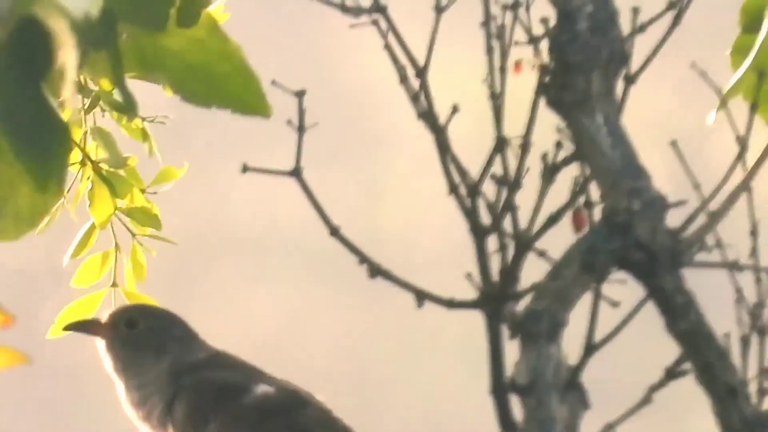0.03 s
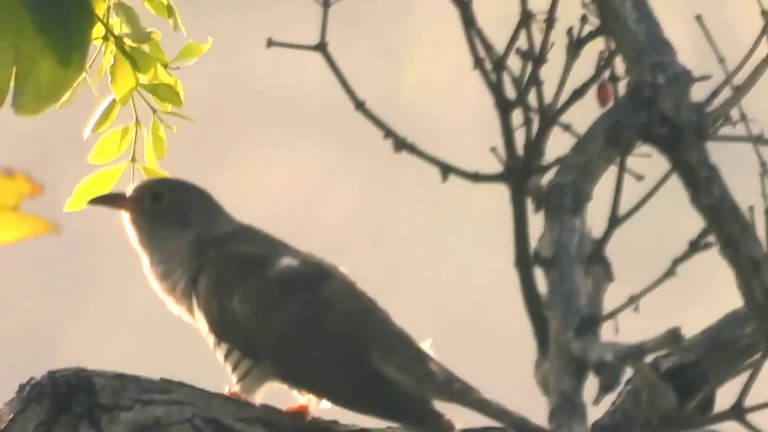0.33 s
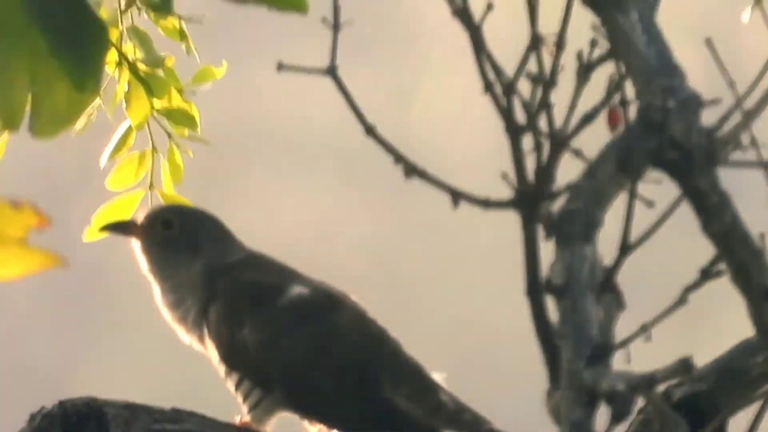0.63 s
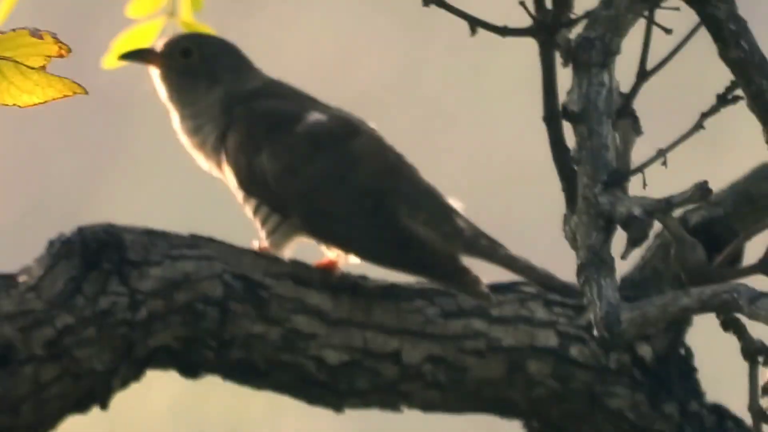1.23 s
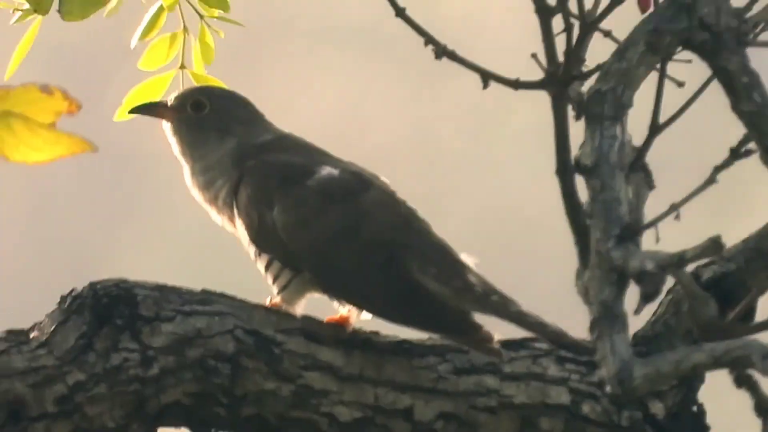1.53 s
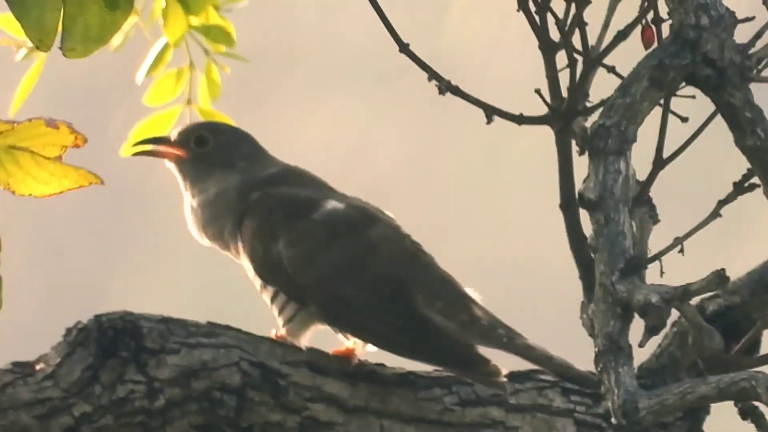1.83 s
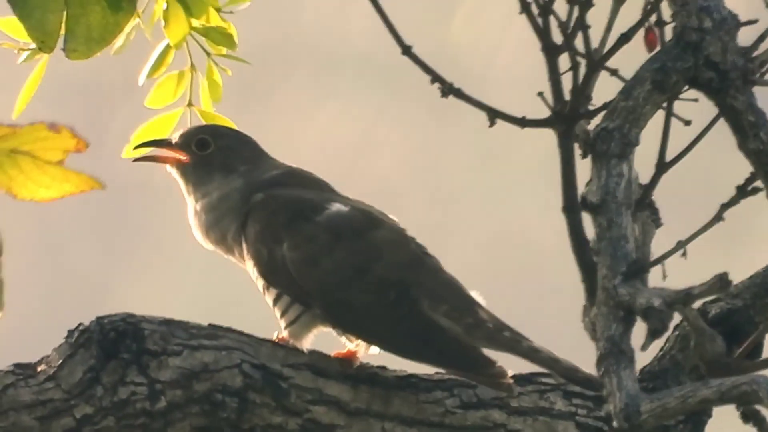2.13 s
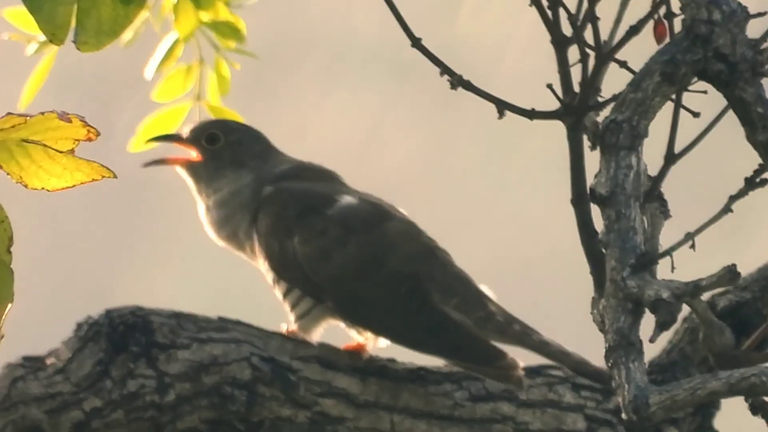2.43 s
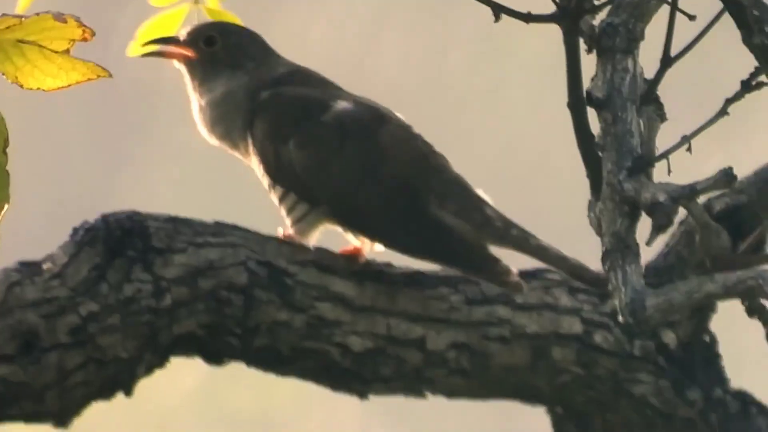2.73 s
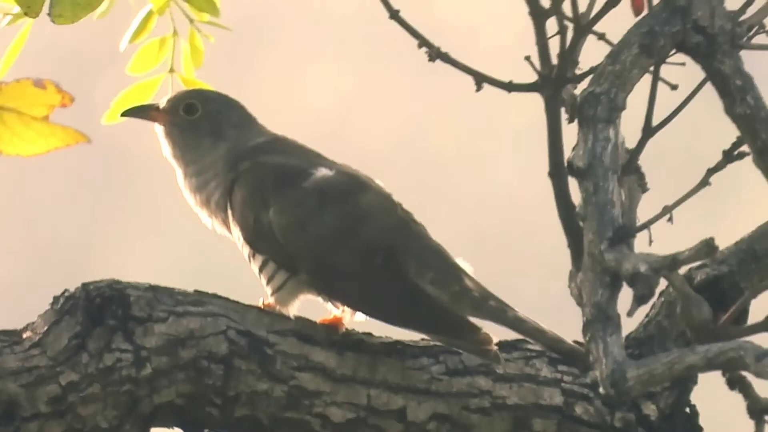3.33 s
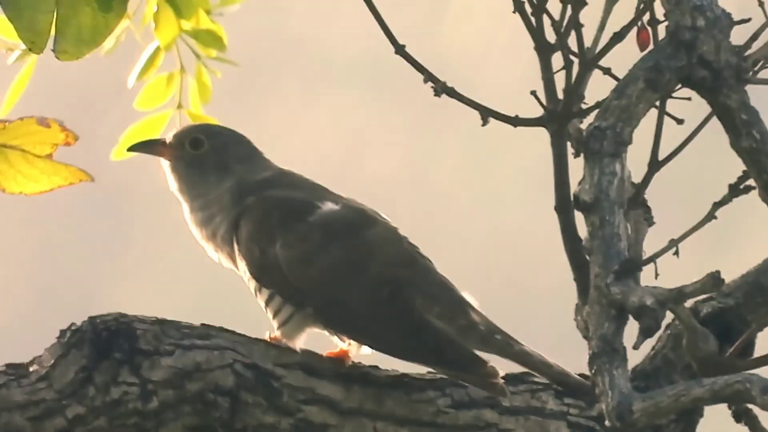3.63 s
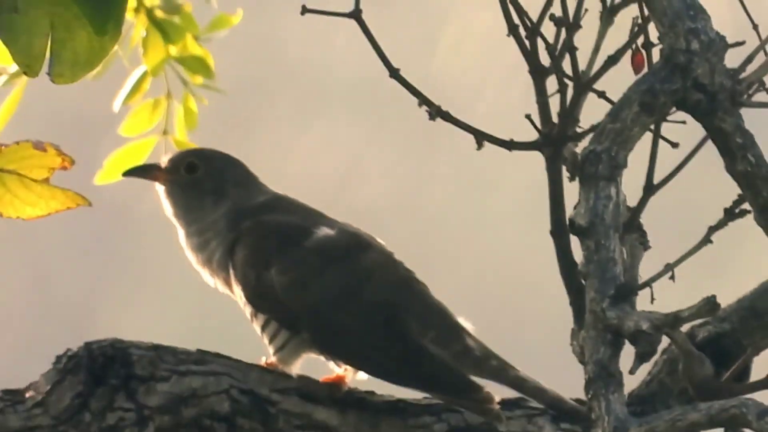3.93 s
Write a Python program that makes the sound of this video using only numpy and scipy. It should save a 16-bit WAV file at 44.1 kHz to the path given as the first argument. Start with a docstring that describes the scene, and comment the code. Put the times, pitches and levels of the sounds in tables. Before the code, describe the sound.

Cuckoos call in echoing woods over faint leaf hush and distant ticking frogs. A twig snaps at the start. A hollow, falling two-note call comes at 0.4 seconds, then small birds twitter and whistle until 1.5. From 2 to 3 seconds a louder cuckoo whistles four higher notes, overlapping the first's repeat at 2.6. A songbird buzzes, a dove coos softly, and one last cuckoo note sounds near 3.9.

```python
"""Echoing woods. Over a bed of leaf hush, insects and faint rumble a twig snaps; far frogs start
ticking and a thin pip repeats. A cuckoo calls a hollow "cuck-oo" as distant birds whistle, a scratchy
twitter and treble chatter build, and a near songbird chirps. From 2 s a second cuckoo scoops up to four
higher whistles, overlapping the first one's next call; the songbird buzzes, a dove coos softly and
there is one dry click. A last lone "cuck" comes just before the end."""
import sys
import numpy as np
from scipy import signal
from scipy.fft import rfft, irfft, next_fast_len
from scipy.io import wavfile
from scipy.ndimage import uniform_filter1d, map_coordinates

SR = 44100
rng = np.random.default_rng(int(sys.argv[2]) if len(sys.argv) > 2 else 0)


def output_pcm(signal):
    """Save a mono or channel-first signal as 16-bit PCM at the path in sys.argv[1].

    Samples are clipped to [-1, 1] before scaling.
    """
    pcm = np.clip(np.atleast_2d(signal).T, -1, 1) * 32767
    wavfile.write(sys.argv[1], SR, np.round(pcm).astype(np.int16))


N = 176400


def amp(db):
    """Decibels to gain."""
    return 10 ** (np.asarray(db) / 20)


def unit(x):
    """Scale to rms 1."""
    return x / np.sqrt(np.mean(x ** 2) + 1e-20)


def along(points, hz):
    """Read a curve of (f/Hz, value) points on a log frequency axis."""
    f, v = np.transpose(points)
    return np.interp(np.log(hz + 1), np.log(f + 1), v)


def wobble(rate, size):
    """A smooth random modulator, rate knots a second."""
    return map_coordinates(rng.standard_normal(int(size * rate / SR) + 4), [np.arange(size) * rate / SR])


def filtered(x, response):
    """Play x through a frequency response."""
    m = next_fast_len(N + SR // 2)
    return irfft(rfft(x, m) * response(np.fft.rfftfreq(m, 1 / SR)), m)[..., :N]


def add(out, s, x, pan_db=0):
    """Mix a sound in at time s; pan is left level over right."""
    i = max(round(s * SR), 0)
    out[:, i:i + len(x)] += amp([[pan_db / 2], [-pan_db / 2]]) * x[:N - i]


def lagged(x, lag_s):
    """Sound from the left reaches the right channel later."""
    return filtered(x, lambda f: np.exp(1j * np.pi * f * lag_s * np.array([[1], [-1]])))


def tone(hz, partials=(), rough=0, rough_hz=600):
    """A whistle on a pitch curve, with weak partials and a flutter of phase and level."""
    phase = 2 * np.pi * np.cumsum(hz) / SR + 2 * rough * wobble(rough_hz, len(hz))
    wave = np.sin(phase) + sum(amp(db) * np.sin(k * phase) for k, db in partials)
    return unit(wave * (1 + rough * wobble(rough_hz, len(hz))))


def glides(rows, partials=(), swing_hz=0, buzz_hz=245.5, rough_hz=600):
    """Notes that bend through three pitches; a fast swing of pitch and level makes them buzz."""
    out = np.zeros((2, N))
    for s, length, first, middle, last, db, rough, pan_db in rows:
        u = np.linspace(0, 1, int(length * SR))
        hz = np.polyval(np.polyfit([0, .5, 1], [first, middle, last], 2), u)
        beat = np.sin(2 * np.pi * buzz_hz * length * u + wobble(89.4, len(u)))
        gain = np.abs(np.sin(np.pi * u ** 0.84)) * (1 + 0.41 * beat * (swing_hz > 0))
        add(out, s, amp(db) * gain * tone(hz + swing_hz * beat, partials, rough, rough_hz), pan_db)
    return out


# stereo image of the noise beds: f/Hz, left-right correlation
BED_IMAGE = [(60, 0.25), (300, 0.81), (800, 0.71), (2000, 0.46), (5000, 0.064)]
def rush(colour, patchy_db):
    """A stereo noise bed of rms 1, mottled with patches of random gain."""
    spectrum = signal.stft(rng.standard_normal((2, N)), nperseg=512)[2]
    patches = uniform_filter1d(rng.standard_normal(spectrum.shape[1:]), size=5, axis=0)
    patches = unit(uniform_filter1d(patches, size=14, axis=1))
    pair = signal.istft(spectrum * amp(patchy_db * patches), nperseg=512)[1][:, :N]
    spread = lambda hz: np.arccos(np.clip(along(BED_IMAGE, hz), -1, 1)) / 2
    mid, side = filtered(pair, lambda hz: colour(hz) * [np.cos(spread(hz)), np.sin(spread(hz))])
    return unit(np.array([mid + side, mid - side]))


# EQ of the leaf hush: f/Hz, level/dB
LEAF_EQ = [(25, -47), (70, -30.5), (110, -23), (175, -6), (300, -7.5), (480, -7.5), (600, -4), (880, -3.5),
           (1300, -11.5), (2400, -14), (3400, -12), (4500, -19.5), (6200, -31.5), (7500, -21.5),
           (10000, -46)]
def leaves(level_db=-55.5, top_hz=8230):
    """An even hush of leaves, gently breathing."""
    hush = rush(lambda f: amp(along(LEAF_EQ, f)) / np.sqrt(1 + (f / top_hz) ** 70), patchy_db=2.2)
    return amp(level_db + .7 * wobble(4, N)) * hush


# fader ride of the chatter: t/s, level/dB
CHATTER_RIDE = [(0, -82), (.55, -68.5), (.85, -63), (1.08, -57), (1.36, -55.5), (1.5, -62.5), (1.9, -71),
                (2.4, -73.5), (4, -79.5)]
# its EQ: f/Hz, level/dB
CHATTER_EQ = [(1500, -48), (3000, -6), (5000, 5), (6800, -12), (9000, -41)]
def chatter(surge_hz=7.1, crest_s=1.052, surge_db=2):
    """Far treble chatter: bright noise that comes in quick waves."""
    t = np.arange(N) / SR
    ride_db = np.interp(t, *np.transpose(CHATTER_RIDE))
    waves_db = surge_db * np.cos(2 * np.pi * surge_hz * (t - crest_s))
    return amp(ride_db + waves_db) * rush(lambda f: amp(along(CHATTER_EQ, f)), patchy_db=2.5)


def insects(level_db=-77, centre_hz=7250):
    """A thin, flickering band of insect hiss."""
    band = rush(lambda f: np.exp(-((f - centre_hz) / 350) ** 2), patchy_db=2)
    return amp(level_db) * band * unit(amp(6 * wobble(30, N)))


# fader ride of the rumble: t/s, level/dB
RUMBLE_RIDE = [(0, -106), (.6, -97.5), (.87, -73), (1.1, -97), (1.33, -79), (1.6, -92.5), (2.55, -93),
               (2.72, -72), (3.2, -75), (3.45, -98), (4, -84)]
# its EQ: f/Hz, level/dB
RUMBLE_EQ = [(40, -15.5), (60, -1), (85, 8), (130, -14), (300, -43)]
def rumble():
    """A faint low rumble that comes and goes."""
    ride_db = np.interp(np.arange(N) / SR, *np.transpose(RUMBLE_RIDE))
    return amp(ride_db) * rush(lambda f: amp(along(RUMBLE_EQ, f)), patchy_db=2.5)


# twig cracks: t/s, peak level/dB
TWIG_SNAPS = [(0.0113, -31), (0.046, -28), (.0568, -21), (0.063, -33.5)]
# their woody EQ: f/Hz, level/dB
TWIG_EQ = [(60, -60), (200, -22), (550, -16.5), (880, 4), (1300, -7), (1800, -6.5), (5000, -18),
           (8000, -27), (14000, -34.5)]
def twig():
    """A twig breaks in a few dry snaps, each a hard transient with a rustling tail."""
    out, t = np.zeros((2, N)), np.arange(SR // 5) / SR
    for s, db in TWIG_SNAPS:
        burst = rng.standard_normal(len(t)) * (amp(-60 * t / .007) + amp(-25 - 60 * t / .2))
        snap = filtered(np.pad(burst, (64, 0)), lambda hz: amp(along(TWIG_EQ, hz)))[:len(t)]
        add(out, s - .0015, amp(db) * snap / np.abs(snap).max())
    return out


# ticks that stand out of the frog chorus: t/s, level/dB
FROG_TICKS = [(.288, -47.5), (.541, -43), (.655, -46.5), (1.239, -46), (1.338, -49), (1.408, -48),
              (1.474, -47.5), (1.79, -49), (1.976, -48.5), (2.109, -45.5), (2.176, -49.5), (2.543, -47),
              (3.175, -44), (3.241, -45.5), (3.308, -47.5), (3.474, -48), (3.608, -44), (3.711, -42.5)]
# resonances of one tick: f/Hz, level/dB, t60/s
FROG_MODES = [(666.6, 3.5, 0.045), (857, -3.5, 0.054), (965, -5, 0.055)]
def frogs(chorus_db=-55, every_s=.0667, trim_db=3.5):
    """Short, hollow, ringing ticks over a nearly steady train of fainter ones."""
    out, t = np.zeros((2, N)), np.arange(SR // 10) / SR
    chorus = [((k + late / 10 + .5) * every_s, chorus_db + 5 * accent)
              for k, (late, accent) in enumerate(rng.random(size=(56, 2)))]
    for s, db in FROG_TICKS + chorus:
        ring = 0
        for hz, mode_db, t60 in FROG_MODES:
            decay = amp(mode_db + rng.normal(0, 1.5) - 60 * t / t60)
            ring += decay * np.sin(2 * np.pi * (hz * rng.normal(1, .02) * t + rng.random()))
        add(out, s, amp(db + trim_db) * ring * (1 - np.exp(-t / 0.0015)))
    return out


def pips(first_s=.148, every_s=0.2, length_s=0.026, hz=7420, bend_hz=299, level_db=-71):
    """A thin falling pip at a steady pace."""
    return glides([(s + rng.normal(0, 0.0055), length_s, hz + bend_hz, hz, hz - bend_hz,
                    level_db + rng.normal(0, 1.7), .4, 0)
                   for s in np.arange(first_s, N / SR - .1, every_s)])


def shaped(shape, length):
    """Progress, pitch ratio and gain through one note, smoothed and faded at both ends."""
    u = np.linspace(0, 1, int(length * SR))
    at, ratio, db = np.transpose(shape)
    smooth = lambda curve: uniform_filter1d(np.interp(u, at, curve), size=300)
    fade = np.clip(np.minimum(u, 1 - u) / 0.022, 0, 1)
    return u, smooth(ratio), fade * amp(smooth(db))


# "cuck" cues: t/s, length/s, f/Hz, level/dB, mid-note dip/dB (negative lifts)
CUCK_CUES = [(0.354, 0.098, 698, -32.5, -2), (2.56, 0.1, 702.3, -34.5, -1.5),
             (3.864, 0.11, 710.7, -30.5, 12)]
# their arch: share of length, pitch ratio, level/dB
CUCK_ARCH = [(0, 0.848, -22.5), (.14, .975, -5), (.3, 1, -1), (.55, 1.003, -2), (.69, 0.996, -0.5),
             (.79, 0.946, 4.5), (.9, 0.9, -10.5), (1, 0.77, -20)]
# their dip: share of length, share of dip
CUCK_DIP = [(.18, 0.092), (.45, 0.72), (.53, 0.78), (.71, 0.69), (.78, 0.13)]
# their overtone: pitch multiple, level/dB
CUCK_PARTIALS = [(2, -29)]
# "oo" cues: t/s, length/s, f/Hz, level/dB, pan/dB
OO_CUES = [(0.677, 0.205, 593, -31, 4.5), (2.883, 0.21, 593.6, -30.5, 4)]
# their swell: share of length, pitch ratio, level/dB
OO_SWELL = [(0, .998, -18), (.2, 1.002, -1.5), (.4, 1, 0), (.53, .994, -3.3), (.8, .996, -4),
            (1, .995, -18)]
def cuckoo():
    """An arched "cuck" that peaks as its pitch drops, then a longer, lower "oo" on one pitch."""
    out = np.zeros((2, N))
    for s, length, hz, db, dip_db in CUCK_CUES:
        u, ratio, gain = shaped(CUCK_ARCH, length)
        level = amp(db - dip_db * np.interp(u, *np.transpose(CUCK_DIP)))
        add(out, s, level * gain * tone(hz * ratio, CUCK_PARTIALS, rough=.03, rough_hz=200))
    for s, length, hz, db, pan_db in OO_CUES:
        u, ratio, gain = shaped(OO_SWELL, length)
        add(out, s, amp(db) * gain * tone(hz * ratio, rough=0.044, rough_hz=131), pan_db)
    return lagged(out, 3.5e-5)


# far bird cues: t/s, length/s, start f/Hz, middle f/Hz, end f/Hz, level/dB, roughness, pan/dB
FAR_BIRD_CUES = [(.38, 0.13, 6300, 4430, 6700, -68, .1, 2), (.575, 0.071, 3500, 4720, 4750, -66, 0.11, 0),
                 (.62, 0.27, 3910, 4260, 4530, -60, 0.27, -2.5),
                 (.72, 0.098, 1628, 1436, 1130, -53, 0.36, -2),
                 (.97, 0.11, 1599, 1418, 1324, -54, 0.24, -5),
                 (1.1, 0.088, 1800, 1902, 1724, -43, 0.033, 1.5),
                 (1.18, 0.13, 1790, 1614, 1137, -53, 0.22, -1),
                 (1.72, 0.29, 4200, 3606, 3460, -62.5, 0.4, -3),
                 (2.24, 0.097, 6500, 5440, 4050, -66.5, 0.23, 3),
                 (1.08, 0.21, 4100, 4405, 4375, -57.5, 0.3, 0.5),
                 (2.625, 0.042, 3860, 4520, 5520, -59, .3, -1)]
def far_birds():
    """Distant songbirds trade gliding whistles."""
    return glides(FAR_BIRD_CUES)


# twitter cues: t/s, sweep width 0-1, level/dB
TWITTER_CUES = [(.47, .35, -57.5), (.621, 0.49, -52.5), (.779, 0.56, -49.5), (.933, 1, -48.5),
                (1.085, 0.97, -48.5), (1.24, 0.99, -47.5)]
# sweeps in one note: offset t/s, length/s, start, middle and end drop/Hz at full width, level/dB
TWITTER_SWEEPS = [(0, 0.0078, 1700.5, 1400, 845, -9), (.011, 0.0066, 53.5, 700, 1480, -3.5),
                  (.016, .007, 299.5, 650, 837, -2.5), (.021, .009, 1201, 950, 500, -2.5),
                  (.034, .014, -100, 630, 50, 1), (.047, .007, 648, 450, 152, 0)]
def twitter(top_hz=3937, rough=.15, pan_db=9):
    """A small bird repeats one scratchy note of quick sweeps, growing louder and wider."""
    return glides([(s + after, length, *(top_hz - width * np.array(drops)), db + sweep_db, rough, pan_db)
                   for s, width, db in TWITTER_CUES
                   for after, length, *drops, sweep_db in TWITTER_SWEEPS])


# chirp cues: t/s, length/s, start f/Hz, middle f/Hz, end f/Hz, level/dB, roughness, pan/dB
CHIRP_CUES = [(1.328, 0.014, 3280, 2610, 2373, -53, 0.43, 4.1),
              (1.36, 0.072, 2704, 2624, 2500, -55.5, 0.2, 7),
              (1.425, 0.085, 3250, 3440, 2920, -43.5, 0.18, 8.9),
              (2.305, 0.0545, 3507, 3193, 3150, -47.5, 0.13, 8.4),
              (2.905, .02, 3520, 2860, 2100, -54, 0.6, 8.9),
              (2.965, 0.056, 2846, 2666, 2620, -56.5, 0.41, 8.5),
              (3.01, 0.085, 3250, 3406, 2894, -49.5, 0.13, 17.4)]
# side tones below and above the note: pitch multiple, level/dB
CHIRP_SIDE_TONES = [(0.669, -16), (1.333, -22)]
def chirps():
    """The near songbird's short, grainy, falling notes."""
    return glides(CHIRP_CUES, CHIRP_SIDE_TONES)


# whistle cues: t/s, length/s, final f/Hz, scoop depth/Hz, scoop time/s, slow rise/Hz,
# level/dB, swell/dB, overtone level/dB, pan/dB
WHISTLE_CUES = [(2.046, 0.069, 1075, 195, .015, 15.5, -21, 28.5, -60.5, 0.5),
                (2.29, 0.11, 1054, 110, 0.0066, 25.5, -24, 17.5, -59, 1),
                (2.57, 0.096, 1154, 170, .007, 35, -18.5, 12, -53.5, 1),
                (2.841, 0.094, 979.5, 14, .007, -16.5, -32, 8.5, -58.5, 7)]
# EQ of the overtones: f/Hz, level/dB
RASP_EQ = [(2200, -13), (3400, -10.5), (4500, -21), (5900, 0), (6800, -14.5), (8000, -22), (10200, -14.5),
           (11400, -27.5), (12600, -23.5), (13700, -32.5)]
def second_cuckoo(attack_s=0.026, release_s=0.042, rasp_swell_db=10.5):
    """Four whistles scoop up and swell; returns two stems, pure tone and thin rasping overtones."""
    pure, rasp = np.zeros((2, N)), np.zeros((2, N))
    for s, length, hz, scoop_hz, scoop_s, rise_hz, db, swell_db, rasp_db, pan_db in WHISTLE_CUES:
        t = np.arange(int(length * SR)) / SR
        attack = np.sin(np.pi / 2 * np.minimum(t / attack_s, 1))
        release = np.sin(np.pi / 2 * np.minimum((length - t) / release_s, 1)) ** 2
        gate = attack * release
        swell = np.minimum(t / (length - release_s / 2) - 1, 0)  # climbs from -1 to 0
        pitch = hz - scoop_hz * np.exp(-t / scoop_s) - rise_hz * (1 - t / length)
        add(pure, s, amp(db + swell_db * swell) * gate * tone(pitch, rough=.01, rough_hz=193), pan_db)
        for k in range(2, 14):
            overtone = tone(k * pitch, rough=0.038 * k, rough_hz=330)
            level_db = rasp_db + along(RASP_EQ, k * hz) + rasp_swell_db * swell
            flicker_db = 4.1 * wobble(60, len(t))
            add(rasp, s, amp(level_db + flicker_db) * np.sqrt(gate) * overtone)
    return lagged(pure, 3.8e-5), lagged(rasp, 2.7e-5)


# slapback on the second cuckoo: delay t/s, level/dB
TREE_SLAPS = [(0.034, -16), (.06, -19)]
def near_trees(x):
    """The sound plus distinct early echoes off nearby trees."""
    return x + filtered(x, lambda f: sum(amp(db) * np.exp(-2j * np.pi * f * s) for s, db in TREE_SLAPS))


# buzz cues: t/s, length/s, start f/Hz, middle f/Hz, end f/Hz, level/dB, roughness, pan/dB
BUZZ_CUES = [(2.172, .11, 3250, 3437, 3415, -44.5, 0.37, 10),
             (2.26, 0.07, 3300, 3290, 3465, -50.5, 0.46, 12),
             (3.495, .105, 3050, 3424, 3550, -48.5, 0.62, 9.6)]
def buzzes():
    """The near songbird swings its pitch so fast that the note buzzes."""
    return glides(BUZZ_CUES, swing_hz=190, rough_hz=802.3)


def foliage(x, t60, wet_db):
    """Leaves close to a bird scatter its call into a short blur."""
    t = np.arange(SR // 5) / SR
    scatter = rng.standard_normal((2, len(t))) * amp(-60 * t / t60)
    blur = signal.fftconvolve(x, scatter / np.linalg.norm(scatter[0]), axes=1)[:, :N]
    return (x + amp(wet_db) * blur) / np.hypot(1, amp(wet_db))


# coo cues: t/s, length/s, start f/Hz, middle f/Hz, end f/Hz, level/dB, roughness, pan/dB
DOVE_CUES = [(2.59, 0.15, 318, 380.5, 392, -49.5, 0.2, -4.5),
             (3.07, 0.14, 400, 395, 434, -52.5, 0.21, -16.5), (3.545, 0.16, 409, 388.3, 429, -50, 0.2, -16)]
def dove():
    """Three soft, low, quavering coos off to the right."""
    return glides(DOVE_CUES, rough_hz=73)


# click cue: t/s, centre f/Hz, peak level/dB, pan/dB
CLICK_CUES = [(2.713, 3900, -40, 7)]
def click():
    """A small dry click: a very short burst of bright noise."""
    out, t = np.zeros((2, N)), np.arange(SR // 5) / SR
    for s, hz, db, pan_db in CLICK_CUES:
        burst = np.pad(rng.standard_normal(len(t)) * amp(-60 * t / .008), (64, 0))
        band = lambda f: np.exp(-2 * np.log((f + 1) / hz) ** 2) / (1 + (f / hz / 2) ** 10)
        hit = filtered(burst, band)[:len(t)]
        add(out, s, amp(db) * hit / np.abs(hit).max(), pan_db)
    return out


# reverb time of the woods: f/Hz, t60/s
WOODS_DECAY = [(200, 0.52), (800, 1.55), (3000, 1.1), (9000, 0.65)]
def woods(x, wet_db, delay_s, width):
    """The sound plus its late, scattered echo from the trees."""
    hz, t, spectrum = signal.stft(rng.standard_normal((2, SR)), SR, nperseg=256)
    decay = amp(-60 * t / along(WOODS_DECAY, hz)[:, None])
    mid, side = signal.istft(spectrum * decay, SR, nperseg=256)[1]
    tail = np.array([mid + width * side, mid - width * side])
    tail = np.pad(tail / np.linalg.norm(tail[0]), ((0, 0), (int(delay_s * SR), 0)))
    return x + amp(wet_db) * signal.fftconvolve(x.mean(0)[None], tail, axes=1)[:, :N]


def scene():
    """The mix: beds and pips stay dry, and reverb sends set each caller's distance in the woods."""
    beds = leaves() + chatter() + insects() + rumble()
    small_sounds = lagged(twig() + click(), 3e-5) + frogs() + dove()
    near_birds = lagged(twitter() + chirps() + foliage(buzzes(), t60=.08, wet_db=-3.5), 6e-5)
    whistles, rasp = second_cuckoo()
    return (beds + pips()
            + woods(small_sounds, wet_db=-13.5, delay_s=.02, width=0.17)
            + woods(cuckoo(), wet_db=-15.5, delay_s=0.05, width=0.34)
            + woods(far_birds(), wet_db=-7.5, delay_s=.02, width=0.61)
            + woods(near_birds, wet_db=-9, delay_s=0.02, width=0.45)
            + woods(near_trees(whistles), wet_db=-19, delay_s=0.06, width=0.26)
            + woods(rasp, wet_db=-7, delay_s=.03, width=0.96))


def record(dry, top_hz=13800):
    """A brick-wall low-pass on the whole mix."""
    return filtered(dry, lambda hz: hz < top_hz)


dry = scene()
out = record(dry)
output_pcm(out)
```